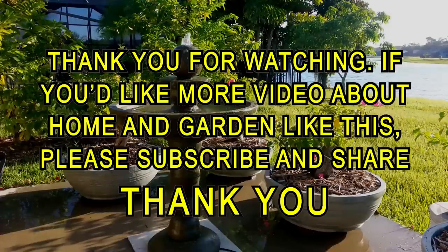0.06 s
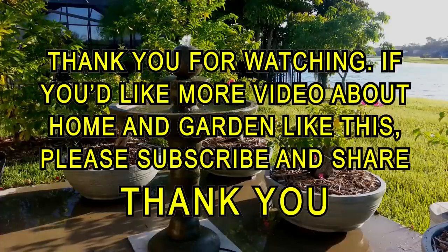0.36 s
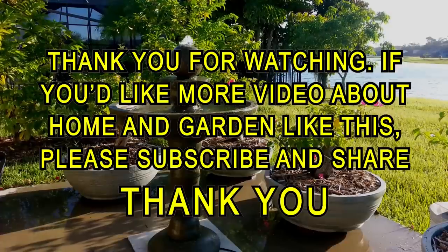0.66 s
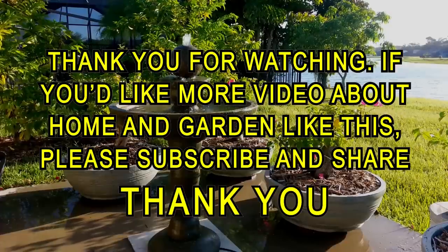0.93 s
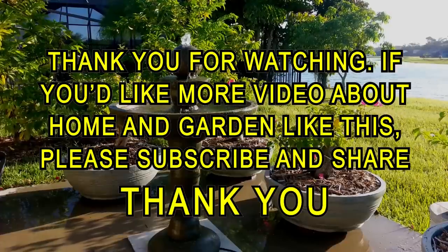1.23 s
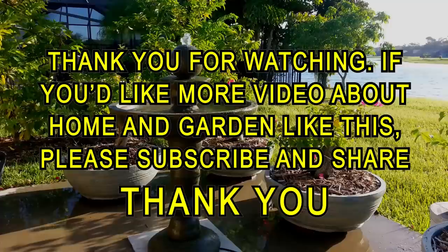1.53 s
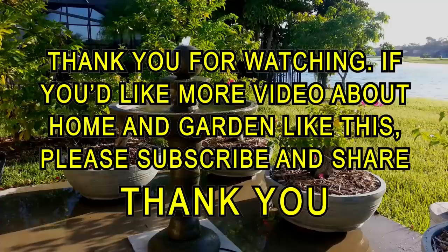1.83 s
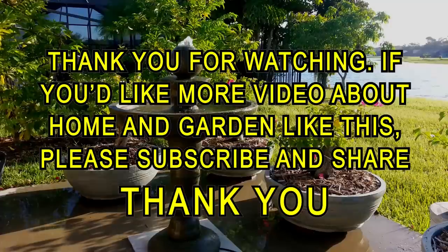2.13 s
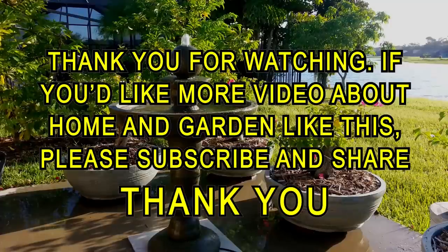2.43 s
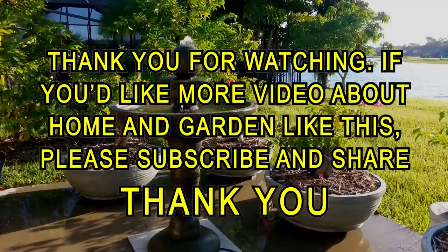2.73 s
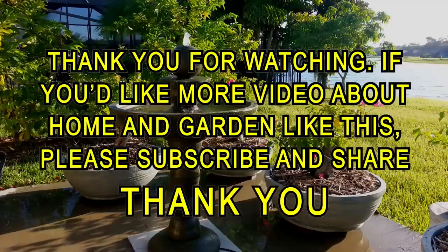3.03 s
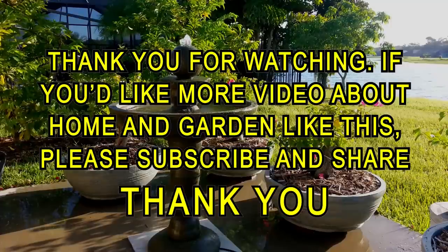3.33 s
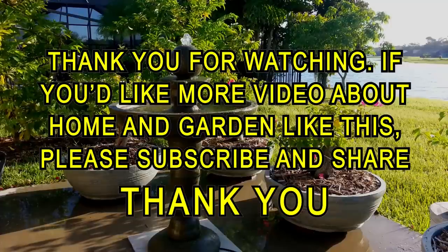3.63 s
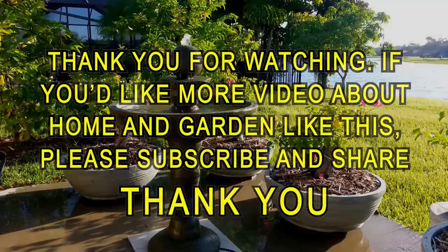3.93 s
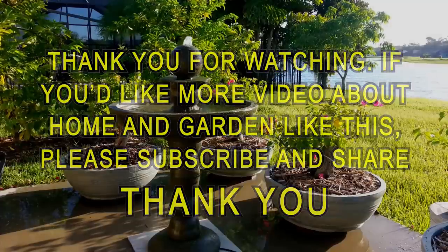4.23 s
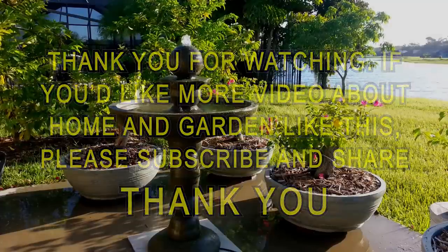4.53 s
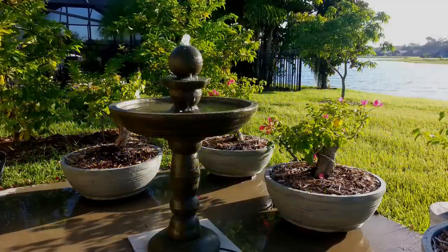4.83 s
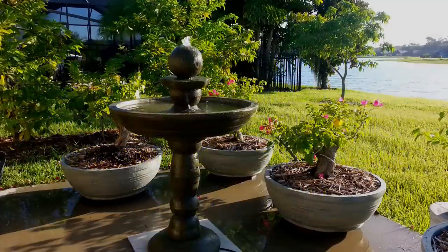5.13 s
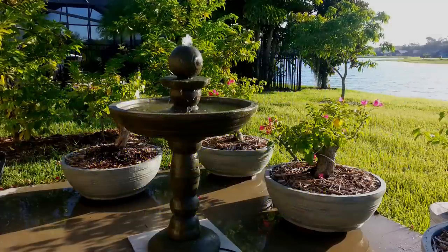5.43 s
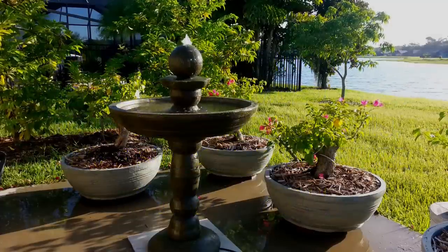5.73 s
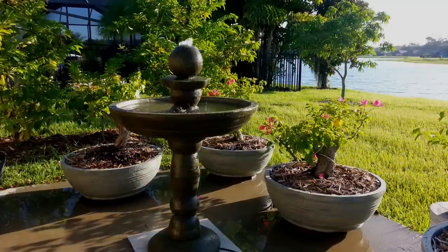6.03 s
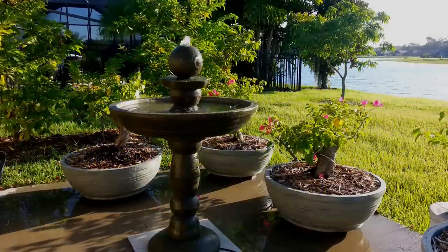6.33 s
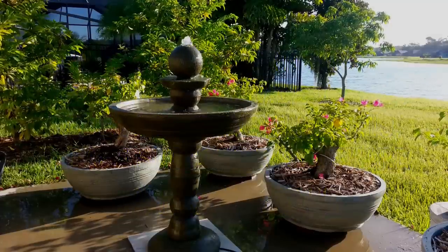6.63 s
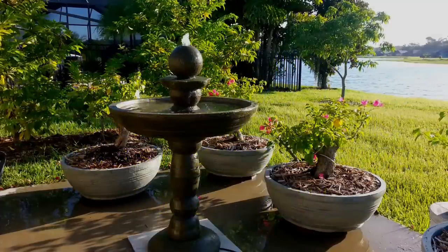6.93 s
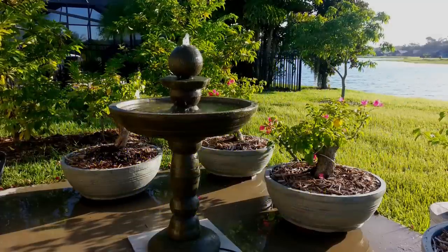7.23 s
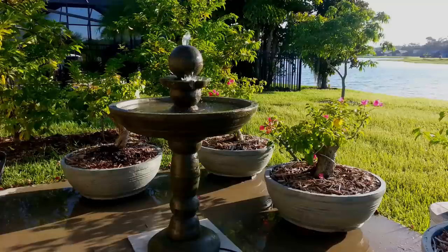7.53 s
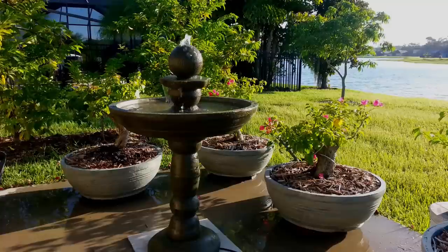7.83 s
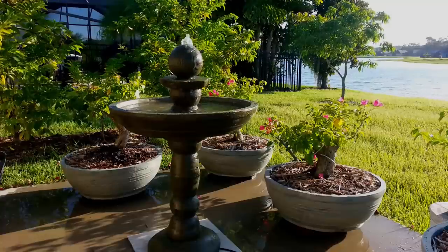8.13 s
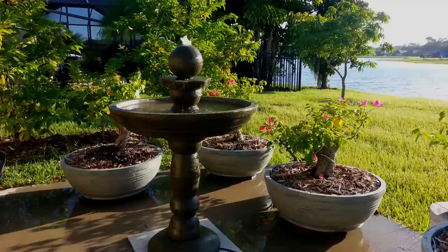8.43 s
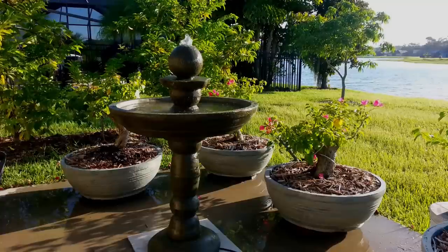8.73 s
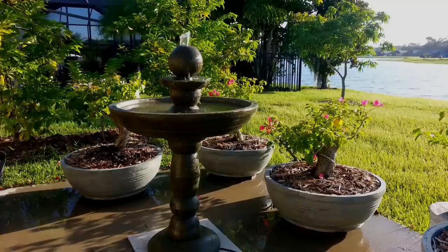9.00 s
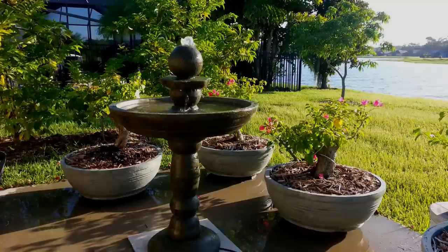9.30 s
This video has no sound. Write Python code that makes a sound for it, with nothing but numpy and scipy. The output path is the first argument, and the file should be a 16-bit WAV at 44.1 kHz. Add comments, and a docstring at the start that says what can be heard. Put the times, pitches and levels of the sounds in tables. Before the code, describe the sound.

A small cement fountain trickles and splashes close by for about nine and a half seconds, over a soft, steady outdoor hum. From the start, water spills into the bowl in loose little gushes, making a continuous babble of bubbles with distinct plinks and rounder plops. Drops slap the wet cement and scatter into fine, ticking spray, and the bowl adds a slight hollow ring. The water sits a little to the left, with clearer plops near 0.4, 3 and 4.4 seconds. From about 5 to 8 seconds it is slightly lighter and more centered. One faint, dull knock sounds under the patter near 7 seconds. A cluster of plops comes just after 8 seconds, and the whole sound dips for an instant at about 8.3 seconds. The trickle then carries on, leaning left again, with a small gush at the end.

```python
"""A small cement fountain in a quiet garden.

Over a soft outdoor hum, water wells over the top in uneven gushes and falls into the bowl. Trapped air
bubbles resonate as babble, plinks and plops; drops strike the wet cement and scatter into fine spray.
Each impulse excites the bowl's modes and a short reverberation. Late on come one dull knock and a
brief dip in level."""
import sys
import numpy as np
from scipy import signal
from scipy.fft import rfft, irfft
from scipy.io import wavfile

SR = 44100
rng = np.random.default_rng(int(sys.argv[2]) if len(sys.argv) > 2 else 0)


def unload_wav(signal):
    """Save mono or channel-first audio to the path in sys.argv[1] as 16-bit WAV at rate SR, clipped to [-1, 1]."""
    wavfile.write(
        sys.argv[1],
        SR,
        np.round(np.clip(np.atleast_2d(signal).T, -1, 1) * 32767).astype(np.int16),
    )


N = 421596
LAG_S = 0.0018  # scale of the delay between the channels, different for every drop
FLUTTER_PER_S = 14  # how fast the falling strands break up
SPLASHY_HZ = 1640  # bubbles below this pitch slip in with less and less splash


def from_db(db):
    """Decibels to amplitude ratio."""
    return 10 ** (np.asarray(db) / 20)


def unit(x):
    """Normalisation to an rms of 1."""
    return x / np.sqrt(np.mean(x ** 2) + 1e-20)


def spectrum(table, hz, column=1):
    """Linear interpolation of a column over log frequency."""
    table = np.array(table)
    return np.interp(np.log(hz + 1), np.log(table[:, 0] + 1), table[:, column])


def curve(table, column=1):
    """Linear interpolation of a column over the whole duration."""
    table = np.array(table)
    return np.interp(np.arange(N) / SR, table[:, 0], table[:, column])


def add(track, s, sound):
    """Superposition of a sound on a track at s seconds."""
    part = track[max(round(s * SR), 0):][:len(sound)]
    part += sound[:len(part)]


def add_pair(pair, s, sound, lag, pan_db):
    """Localisation by time and level difference: the right channel is lag seconds later."""
    add(pair[0], s, sound * from_db(pan_db / 2))
    add(pair[1], s + lag, sound * from_db(-pan_db / 2))


def wander(per_s):
    """Random modulation of spread about 1, turning per_s times a second."""
    points = np.clip(rng.standard_normal(600), -2, 2)
    return np.interp(np.arange(N) / SR * per_s, np.arange(len(points)), points)


def butterworth(x, order, hz, kind):
    """Filtering with a maximally flat passband."""
    return signal.sosfilt(signal.butter(order, hz, kind, fs=SR, output="sos"), x + 1e-18)


def resonate(x, hz, q):
    """A second-order resonance that conserves the power of white noise."""
    return signal.lfilter(*signal.iirpeak(hz, q, fs=SR), x) * np.sqrt(q * SR / (np.pi * hz))


def colour(x, table, size=2048):
    """Minimum-phase filtering gives each channel its own spectrum and keeps attacks sharp."""
    hz = abs(np.fft.fftfreq(size, 1 / SR))
    log_gain = np.log(from_db([spectrum(table, hz, 1), spectrum(table, hz, 2)]))
    taps = np.fft.ifft(np.exp(signal.hilbert(log_gain).conj())).real
    return signal.oaconvolve(x, taps / np.sqrt((taps ** 2).sum() / 2), axes=1)[:, :N]


# Spectrum of the distant hum. Each row: frequency in Hz, relative spectral density in dB.
HUM_SPECTRUM = [(15, -19), (30, -8), (55, -4.5), (150, -1.5), (260, -3), (380, -2), (520, -6), (900, -11.5),
                (2000, -10.5), (6000, -14.5), (10500, -33), (12000, -41)]

def outdoor_hum(level_db=-55.5, shared=0.3, waver_db=2.5, wavers_per_s=12.5):
    """Diffuse ambient noise: a wavering hum, only weakly correlated between the channels."""
    noise = rng.standard_normal((3, N))
    gain = from_db(spectrum(HUM_SPECTRUM, np.fft.rfftfreq(N, 1 / SR)))
    hum = irfft(rfft(noise[:2] + shared * noise[2]) * gain, N)
    return unit(hum * from_db(waver_db * wander(wavers_per_s))) * from_db(level_db)


def gushes(per_s=3.1, uneven=0.32):
    """Quasi-periodic overflow: water slops over the rim in a loose rhythm, from -1 to 1."""
    rate = per_s * (1 + uneven * wander(per_s))
    return np.sin(2 * np.pi * np.cumsum(rate) / SR)


def bubble(hz, ring_s, rise_per_s=2.0, swell_cycles=1.0, hold=1.24):
    """Damped oscillation of trapped air, rising in pitch as the bubble nears the surface."""
    t = np.arange(0, 3 * ring_s, 1 / SR)
    cycles = np.cumsum(hz * (1 + rise_per_s * (t - ring_s / 2))) / SR
    envelope = (1 - np.exp(-cycles / swell_cycles)) * np.exp(-(t / ring_s) ** hold)
    return envelope / envelope.max() * np.sin(2 * np.pi * cycles)


def splat(crack_s, scatter_s, scatter_db, grain_db=-8.5):
    """Impact noise: a drop bursts with a crack, and its droplets land in a grainy decay."""
    t = np.arange(5000) / SR
    grains = unit(from_db(grain_db * rng.standard_normal(125)).repeat(40))
    envelope = np.exp(-t / crack_s) + from_db(scatter_db) * grains * np.exp(-t / scatter_s)
    return rng.standard_normal(len(t)) * envelope * (1 - np.exp(-t / .0012))


# The falling water. Each row: time in seconds, level into the bowl in dB, level as spray in dB,
# left-right bias in dB (the babble follows it in part).
FLOW = [(0, -50, -49.5, 6.5), (0.53, -51, -51, 8), (0.74, -41, -49.5, 6), (0.88, -45.5, -46, 7),
        (0.98, -46, -55.5, 4), (1.05, -43.5, -52.5, 1), (1.28, -49, -49, 3), (1.4, -44.5, -54, 10),
        (1.53, -48, -53, 3), (2.08, -46, -53, 7), (2.36, -52, -53.5, 3), (2.8, -45, -53, 10),
        (2.94, -48, -64, 9), (3.05, -45.5, -50.5, 6), (3.25, -49.5, -55.5, 7), (3.52, -47, -54, 7),
        (3.65, -51, -60.5, 10), (3.72, -46, -51.5, 2.5), (4.07, -44.5, -52, 3), (4.39, -46, -56, 7),
        (4.5, -47.5, -49, 1), (4.58, -50, -43.5, 7), (4.68, -51, -55, 7), (4.87, -50.5, -53, 5.5),
        (5.22, -55, -51.5, 0), (5.38, -54.5, -51.5, 3), (5.45, -47, -51.5, 3.5), (5.72, -48.5, -55.5, -6),
        (5.8, -53, -65, 6), (5.88, -53, -49.5, 4), (5.96, -55, -54.5, 8), (6.18, -48.5, -57, 1),
        (6.28, -54, -51.5, 3), (6.4, -59.5, -54, 1), (6.52, -41.5, -51, -1), (6.63, -55, -55.5, -4),
        (6.8, -49.5, -55, 1.5), (7.05, -54.5, -59, -2), (7.14, -50.5, -55, 1), (7.3, -47.5, -56.5, -2),
        (7.48, -48.5, -50.5, -6), (7.9, -48, -53.5, -1), (8, -51, -54, 1), (8.36, -49.5, -52.5, 8.5),
        (8.56, -49, -50.5, 7), (8.81, -48.5, -50.5, 13), (9.1, -52, -49.5, 4.5), (9.48, -45, -49.5, 3),
        (9.56, -37, -55, 1)]
# Spectrum of the small bubbles. Each row: frequency in Hz, left and right relative levels in dB.
BABBLE_SPECTRUM = [(720, -18.5, -13), (770, -5, -6.5), (1032, 3.5, 1.5), (1075, -7, -4.5), (1270, -3.5, -1),
                   (1457, -7, -27.5), (1600, 0.5, -2.5), (1880, -6.5, -5.5), (2065, 0.5, -8.5),
                   (2300, -5, -6), (2755, -18.5, -14.5), (2760, -30, -55), (3450, -13, -11)]

def babble(gush, per_s=480, size_db=3.0, ring_cycles=9, ring_spread=0.54, pan_db=3, churn_db=-11,
           level_db=1.86, gush_db=-0.5, flutter_db=1.5, lean=0.68):
    """Incoherent sum of many small bubble resonances, louder when more water falls."""
    out, slots, kinds = np.zeros((2, N)), 7000, 260
    chance = rng.random((slots, 2))
    normal = np.clip(rng.standard_normal((slots, 3)), -2.5, 1.5)
    lengths = np.clip(rng.standard_normal(kinds), -2.5, 1.5)
    sounds = []
    for pitch, length in zip(np.linspace(0, 1, kinds), lengths):
        hz = 760 * (3300 / 760) ** (pitch ** 0.718)  # big, low bubbles are rarer
        splash = splat(crack_s=0.0064, scatter_s=0.0053, scatter_db=-29)[:SR // 16]
        sound = from_db(churn_db) * resonate(splash, hz, q=11.5)
        add(sound, 0, bubble(hz, ring_cycles / hz * np.exp(ring_spread * length)))
        sounds.append(hz * sound)
    for k, ((when, born), (size, side, late)) in enumerate(zip(chance, normal)):
        if born < per_s * N / SR / slots:
            sound = sounds[k % kinds] * from_db(size_db * size)
            add_pair(out, when * N / SR, sound, LAG_S * late, pan_db * side)
    left, right = butterworth(colour(out, BABBLE_SPECTRUM), 4, 3800, "low")
    pour = from_db(curve(FLOW) + level_db + gush_db * gush + flutter_db * wander(FLUTTER_PER_S))
    to_left = from_db(lean * curve(FLOW, column=3) / 2)
    return np.array([unit(left) * to_left, unit(right) / to_left]) * np.hypot(pour, swarms())


# Spectrum of the spray. Each row: frequency in Hz, left and right relative levels in dB.
SPRAY_SPECTRUM = [(2550, -5, -12), (3820, -18, -21), (3940, -12.5, -16), (5660, -8.5, -31),
                  (6250, -20.5, -29), (7016, -10.5, -4.5), (8080, -32, -17), (8550, -13.5, -7),
                  (10100, -22.5, -18.5), (10830, -25, -13), (10800, -22, -64), (12100, -40, -62),
                  (15800, -67, -76)]

def spray(gush, drops_per_s=120, drop_spread_db=3.5, plinks_per_s=380, plink_spread_db=5.0,
          plink_cycles=24, plinks_db=-5, fizz_db=-6.5, gush_db=1.0, flutter_db=3.5):
    """Air entrainment: light drops land and leave tiny ringing bubbles; the finest droplets fizz."""
    drops, plinks = np.zeros((2, 2, N))
    slots, per_drop = 1600, 8
    chance = rng.random((slots, 2))
    normal = np.clip(rng.standard_normal((slots, 3)), -2.5, 1.8)
    fizz = rng.standard_normal((2, N))
    bursts = [resonate(splat(crack_s=.007, scatter_s=.028, scatter_db=-8), hz, q=4)
              for hz in np.linspace(3000, 10500, 120)]
    rings = [bubble(hz, plink_cycles / hz, swell_cycles=3) for hz in np.linspace(2900, 10100, 150)]
    plink_chance = rng.random((slots, per_drop, 3))
    plink_size = np.clip(rng.standard_normal((slots, per_drop)), -2.5, 1.6)
    for k, ((when, born), (size, side, late)) in enumerate(zip(chance, normal)):
        if born < drops_per_s * N / SR / slots:
            s, strength, lag = when * N / SR, from_db(drop_spread_db * size), LAG_S * late
            add_pair(drops, s, bursts[k % len(bursts)] * strength, lag, 2 * side)
            for (delay, pitch, trapped), loud in zip(plink_chance[k], plink_size[k]):
                if trapped < plinks_per_s / drops_per_s / per_drop:
                    gain = np.sqrt(strength) * from_db(plink_spread_db * loud)
                    plink = rings[int(pitch * len(rings))] * gain
                    add_pair(plinks, s + .04 * delay ** 2, plink, lag, 3 * side)
    water = sum(from_db(db) * unit(colour(layer, SPRAY_SPECTRUM))
                for layer, db in [(drops, 0), (plinks, plinks_db), (fizz, fizz_db)])
    return water * from_db(curve(FLOW, column=2) + gush_db * gush + flutter_db * wander(FLUTTER_PER_S))


# The loudest bubbles. Each row: start in seconds, level in dB, pitch in Hz, ring time in seconds,
# left minus right in dB.
LOUD_BUBBLES = [(0.014, -35, 1260, 0.0066, 10), (0.126, -32.5, 957, 0.012, 9), (0.168, -34, 840, 0.012, 2),
                (0.255, -26.5, 1940, 0.0052, 2), (0.287, -27, 1160, 0.0018, 6),
                (0.329, -29, 2050, 0.0016, 4), (0.364, -19.5, 970, 0.009, 4.5),
                (0.398, -33.5, 2115, 0.0075, 3), (0.442, -29.5, 1500, 0.0014, 10),
                (0.512, -23, 2020, 0.0053, 6), (0.528, -33.5, 1610, 0.0075, 10),
                (0.573, -24.5, 1180, 0.0019, 6), (0.582, -29.5, 1720, 0.0035, 12),
                (0.62, -19.5, 1580, 0.0026, 6), (0.628, -27.0, 2140, 0.0057, 1),
                (0.642, -30.5, 928, 0.012, 8), (0.66, -34, 2320, 0.0036, -2), (0.691, -30.5, 887, 0.021, 6),
                (0.727, -32.5, 1256, 0.0072, 11), (0.742, -30, 2180, 0.016, -8),
                (0.849, -34, 1016, 0.0078, 9), (0.885, -33.5, 853, 0.021, 7.5),
                (0.886, -32, 2120, 0.0046, 12), (0.939, -32, 1690, 0.0059, 2), (1.005, -32, 904, 0.0079, 5),
                (1.015, -26, 920, 0.0054, 7), (1.022, -29, 2420, 0.0058, -4), (1.063, -27, 2120, 0.003, 5),
                (1.068, -31.5, 1050, 0.025, 6), (1.122, -28, 2090, 0.0044, 3), (1.14, -34, 970, 0.011, 6),
                (1.175, -25, 2050, 0.0035, 9), (1.185, -28, 2027, 0.0064, 3), (1.238, -35, 2000, 0.0042, 3),
                (1.26, -39, 1090, 0.006, 10), (1.326, -29.5, 1950, 0.0066, 4),
                (1.342, -30.5, 804, 0.036, 4), (1.358, -21, 853, 0.0088, 7), (1.38, -29, 986, 0.0093, 10),
                (1.452, -31, 2010, 0.0026, 14), (1.46, -32, 2380, 0.0083, 2), (1.662, -23, 870, 0.013, 5),
                (1.731, -32, 1230, 0.017, 7), (1.8, -31.5, 1494, 0.0039, 21),
                (1.837, -40.5, 796, 0.0067, 3), (1.885, -24.5, 1700, 0.0062, 7),
                (1.895, -45, 1690, 0.015, -2), (1.902, -29.5, 2200, 0.0018, 9),
                (2.05, -31, 1610, 0.018, 2.5), (2.09, -33, 1650, 0.0046, 7), (2.113, -25, 977, 0.0097, 5),
                (2.215, -31, 1860, 0.005, 5), (2.258, -29.5, 2040, 0.0018, 11),
                (2.298, -31.5, 2100, 0.0031, 10), (2.39, -32.5, 964, 0.012, 3),
                (2.408, -26, 1980, 0.0033, 4), (2.447, -36, 904, 0.013, 1), (2.455, -29, 1000, 0.012, 1),
                (2.467, -31, 1995, 0.011, 7), (2.503, -32, 995, 0.008, 6), (2.504, -28.5, 2050, 0.0046, 7),
                (2.518, -29, 1620, 0.003, 21), (2.523, -32.5, 2040, 0.0025, 12),
                (2.56, -34, 2140, 0.006, 7), (2.561, -28, 1190, 0.0063, 5), (2.732, -32.5, 1930, 0.0075, 3),
                (2.744, -30, 974, 0.022, 5), (2.751, -28.0, 2860, 0.0018, 2), (2.799, -27, 1200, 0.0033, 1),
                (2.819, -34, 875, 0.011, 5.5), (2.867, -32, 900, 0.015, 4), (2.887, -27.5, 1570, 0.0042, 6),
                (2.98, -23.5, 1670, 0.0041, 2), (2.984, -20.5, 920, 0.0089, 2),
                (3.019, -33.5, 1005, 0.0094, 8), (3.03, -24, 2150, 0.0033, 3),
                (3.082, -34.5, 2100, 0.0075, 9), (3.096, -29.5, 1626, 0.018, 7),
                (3.101, -38, 2060, 0.0087, 10), (3.16, -31.5, 1555, 0.0092, 7),
                (3.264, -29, 2030, 0.0025, 4), (3.387, -33.5, 1570, 0.0082, 3),
                (3.604, -30, 2046, 0.0067, -4), (3.61, -29, 1660, 0.0068, 7),
                (3.692, -27.5, 2170, 0.0013, 2), (3.714, -28, 1070, 0.0067, -1),
                (3.721, -30, 1810, 0.0037, -10), (3.727, -25.5, 1240, 0.0065, 14),
                (3.735, -32, 1690, 0.0037, 10), (3.735, -25.5, 1210, 0.0075, -8),
                (3.777, -33.5, 940, 0.0083, 5), (3.975, -44, 1630, 0.0035, -3),
                (4.043, -32.0, 952, 0.026, 11.5), (4.085, -31.5, 970, 0.011, 6),
                (4.107, -31, 873, 0.018, 0), (4.128, -32, 1670, 0.0064, -14),
                (4.128, -32.5, 962, 0.016, -16), (4.136, -31, 960, 0.0085, 14),
                (4.136, -34, 1630, 0.0028, 14), (4.168, -25.5, 2030, 0.00215, 14),
                (4.179, -36, 2090, 0.0041, 8), (4.192, -37, 1010, 0.015, 1), (4.236, -24, 1120, 0.0024, 1),
                (4.245, -32, 1120, 0.0075, 0), (4.373, -34, 1030, 0.0048, 12), (4.39, -20, 920, 0.014, 7),
                (4.402, -21.5, 983, 0.011, -3), (4.515, -33.5, 1650, 0.012, 9),
                (4.523, -32.5, 2130, 0.015, 1), (4.567, -36.5, 2100, 0.016, 5),
                (4.616, -37, 2160, 0.0091, 12), (4.632, -26.5, 1870, 0.0063, 6),
                (4.725, -29, 1930, 0.0018, 4), (4.745, -22, 896, 0.0093, 4.5),
                (4.762, -31.5, 855, 0.017, 2), (4.811, -31, 1990, 0.0044, 6), (4.914, -39, 2120, 0.01, 7),
                (5.055, -32, 2140, 0.0098, 0), (5.131, -29.5, 1560, 0.0028, 6),
                (5.187, -26.5, 1006, 0.016, 1), (5.327, -33.5, 2020, 0.0036, 1),
                (5.341, -33.5, 1574, 0.012, 6), (5.423, -37, 2220, 0.0058, -9),
                (5.466, -33, 985, 0.0049, 0), (5.786, -34, 2080, 0.0077, 0), (5.796, -36, 2080, 0.0081, 8),
                (5.83, -37, 1020, 0.018, -3), (5.882, -26.5, 3260, 0.0027, 3),
                (6.045, -24.5, 1083, 0.009, -3), (6.117, -29.5, 942, 0.014, 1),
                (6.153, -29, 2200, 0.0053, -1), (6.219, -28, 1200, 0.0047, -11),
                (6.32, -38, 1220, 0.0064, -7), (6.321, -32, 1910, 0.0062, 3), (6.495, -26, 741, 0.017, 3),
                (6.516, -26, 946, 0.013, 1), (6.525, -24, 980, 0.005, -6), (6.732, -32.5, 1720, 0.016, 1),
                (6.733, -28, 1040, 0.005, -4), (6.958, -32.5, 2280, 0.0053, -3),
                (7.045, -35, 1004, 0.013, 0), (7.08, -39, 2700, 0.0037, 0),
                (7.087, -34.5, 1044, 0.0087, -11), (7.218, -27.5, 1025, 0.004, -1),
                (7.233, -36, 2024, 0.0041, -1), (7.341, -32, 1640, 0.0038, -3),
                (7.369, -32.5, 1840, 0.0016, 17), (7.644, -32.5, 958, 0.014, -1),
                (7.644, -32, 1570, 0.0035, 1), (7.872, -27.5, 853, 0.016, 0),
                (7.899, -37.5, 1182, 0.012, -2), (7.907, -35, 2000, 0.005, 3),
                (8.076, -36, 1020, 0.0056, -2), (8.104, -32.5, 1650, 0.0036, 1),
                (8.154, -21.5, 918, 0.028, 2), (8.161, -21.5, 950, 0.0061, -15),
                (8.182, -20.5, 973, 0.0046, -1), (8.217, -32, 1717, 0.0074, 15),
                (8.345, -42, 820, 0.036, 4), (8.442, -18, 1164, 0.0046, 3), (8.505, -30.5, 1647, 0.0079, 6),
                (8.528, -33, 2490, 0.0061, 2), (8.662, -24.5, 860, 0.016, 6), (8.743, -34, 985, 0.007, 7),
                (8.775, -24, 2030, 0.0052, 2), (8.903, -31.5, 1260, 0.0086, 7),
                (9.005, -35.5, 1450, 0.0074, 4), (9.014, -31.5, 940, 0.012, 8),
                (9.068, -35, 983, 0.0075, 8), (9.144, -27, 1936, 0.0048, 4), (9.175, -27, 1150, 0.0021, 6),
                (9.217, -27, 2000, 0.0024, 4), (9.252, -22.5, 967, 0.0094, 8), (9.286, -36, 2120, 0.01, 8),
                (9.33, -28, 1450, 0.0022, 8), (9.4, -23.5, 2030, 0.0043, 8),
                (9.416, -36.5, 1600, 0.0086, 9), (9.461, -25.5, 1220, 0.0026, 5),
                (9.47, -29, 1760, 0.003, 6.5), (9.508, -23, 1590, 0.0039, 11),
                (9.515, -30, 2170, 0.0054, 2), (9.529, -34, 2090, 0.0041, 9), (9.529, -31, 917, 0.014, 10),
                (9.548, -31, 2300, 0.0029, 2)]

def plops(level_db=0.6, churn_db=-15, wobble_db=2.6, offspring_db=-10):
    """Bubble resonance: deep bubbles hold a clean note; higher ones churn the water and break up."""
    out = np.zeros((2, N))
    for s, db, hz, ring_s, pan_db in LOUD_BUBBLES:
        splash = splat(crack_s=0.0065, scatter_s=0.014, scatter_db=-2.5)
        churn = butterworth(resonate(splash, hz, q=6.1), 2, 6000, "low")
        splashy = min(hz / SPLASHY_HZ, 1)
        tone = bubble(hz, ring_s, hold=np.interp(hz, [1100, SPLASHY_HZ], [1.48, 1.46]))
        drift = np.append(0, rng.uniform(-1.5, 1.5, 29))  # the amplitude turns every 4 ms
        wobble = np.interp(np.arange(len(tone)) / SR, np.arange(30) * .004, drift)
        sound = churn * from_db(churn_db) * splashy ** 2
        add(sound, 0, tone * from_db(wobble_db * wobble))
        add(sound, ring_s, from_db(offspring_db) * splashy ** 3 * offspring(hz))
        gain = from_db(db + level_db) / from_db([pan_db / 2, -pan_db / 2]).mean()
        add_pair(out, s, sound * gain, LAG_S * rng.uniform(-1.069, 1), pan_db)
    return out


def swarms(decay_s=0.013, level_db=-15):
    """Exponential decay: the envelope of the small bubbles that each loud one stirs up."""
    kicks = np.zeros(N)
    for s, db, hz, _, _ in LOUD_BUBBLES:
        add(kicks, s, from_db([db + level_db]) * min(hz / SPLASHY_HZ, 1) ** 2)
    return signal.lfilter([1], [1, -np.exp(-1 / (decay_s * SR))], kicks)


def offspring(hz, within_s=0.029, detune=.13, ring_cycles=8):
    """Fragmentation: a bubble breaks into four, which ring soon after it and near its pitch."""
    out = np.zeros(SR // 8)
    for delay, tune, strength in rng.random((4, 3)):
        pitch = hz * (1 + detune * (2 * tune - 1))
        add(out, within_s * delay, bubble(pitch, ring_cycles / pitch) * 2 * strength * np.exp(-delay))
    return out


# Hollow resonances of the bowl. Each row: frequency in Hz, time to decay by 60 dB in seconds,
# gain in dB relative to the direct sound at that frequency.
BOWL_MODES = [(1235, 0.2, -6.5), (1625, 0.07, -2), (2092, 0.25, 1.5), (2720, 0.016, 9), (3374, 0.081, -2.5)]

def echoes(x, yard_t60=0.22, yard_db=-15, wall_t60=0.11, wall_db=-9, wall_band_hz=(1600, 6000)):
    """Reverberation: paving and pots scatter a faint tail, wet walls blur it, the bowl's modes ring."""
    t = np.arange(SR // 2) / SR
    fade = from_db(-60 * t / yard_t60) * (1 - np.exp(-t / 0.0017))
    response = rng.standard_normal((2, len(t))) * fade / np.linalg.norm(fade) * from_db(yard_db)
    blur = from_db(-60 * t / wall_t60) * (1 - np.exp(-t / 0.0033))
    walls = butterworth(rng.standard_normal((2, len(t))) * blur, 3, wall_band_hz, "band")
    response += walls / np.linalg.norm(blur) * from_db(wall_db)
    for (hz, t60, db), phases in zip(BOWL_MODES, rng.random((len(BOWL_MODES), 2, 1))):
        decay = from_db(-60 * t / t60)
        response += from_db(db) * 2 * decay / decay.sum() * np.sin(2 * np.pi * (hz * t + phases))
    return signal.oaconvolve(x, response, axes=1)[:, :N]


# The finest droplets. Each row: start in seconds, level before filtering in dB.
DROPLET_TICKS = [(0.2553, -55), (0.4307, -56), (0.6953, -61), (0.8121, -52), (1.1448, -65), (1.3274, -57),
                 (1.6252, -57), (1.7774, -67), (2.1166, -55), (2.2997, -52), (2.8449, -59), (3.3383, -65),
                 (4.0557, -57), (4.6224, -67), (5.015, -48), (5.1013, -58), (5.5767, -63), (5.9459, -58),
                 (6.3026, -62), (6.7022, -54), (7.0783, -61), (7.222, -61), (7.49, -62), (7.6106, -61),
                 (8.4312, -59), (8.8453, -51), (9.0194, -58), (9.2983, -52)]

def ticks(level_db=-1, band_hz=(9500, 14500), pan_spread_db=4):
    """Small impacts radiate high frequencies: single droplets tick on bare cement."""
    out = np.zeros((2, N))
    for s, db in DROPLET_TICKS:
        late, side = rng.uniform(-1.3, 1, 2)
        tick = splat(crack_s=0.0078, scatter_s=0.017, scatter_db=-1.5)
        add_pair(out, s, tick * from_db(db + level_db), LAG_S * late, pan_spread_db * side)
    return butterworth(out, 2, band_hz, "band")


# The heaviest drops on cement. Each row: start in seconds, relative level in dB, pitch in Hz,
# left minus right of the pitched part in dB.
HEAVY_DROPS = [(0.358, -36, 4200, 5), (0.4318, -34.5, 3830, 5), (0.602, -24, 6600, -0.5),
               (0.6928, -28, 8600, 0), (0.85, -30, 4670, 6), (0.919, -28, 4780, 7), (1.061, -26, 4730, 6),
               (1.259, -27.5, 4080, 3.5), (1.373, -30.5, 4780, 10), (1.481, -18, 8200, -3),
               (1.6254, -23, 5260, 17.5), (1.6506, -21.5, 7350, -2), (1.7417, -34.5, 5500, 26),
               (1.91, -33, 5070, 15), (2.114, -22, 6380, -1), (2.4105, -21.5, 8540, -6),
               (2.749, -36, 2850, -1), (2.762, -24.5, 7200, -10), (2.846, -27.5, 8700, -4),
               (2.9786, -25.5, 7200, -2), (3.342, -17.5, 8870, -5), (3.766, -30, 7300, 1),
               (3.914, -23, 6700, -2.0), (4.008, -27.5, 5370, 7), (4.2644, -33, 3510, 6),
               (4.546, -26, 2770, 3), (4.583, -27, 3300, 6), (4.632, -44, 3880, 3),
               (4.7287, -29.5, 8950, -6), (4.9553, -32, 9360, -8), (5.306, -27, 8900, -2),
               (5.439, -27, 7650, -6), (5.576, -32, 7060, -9), (5.697, -30, 3440, 8),
               (5.7861, -26.5, 2850, 2), (5.813, -32, 8040, -8), (5.883, -25, 4310, 5),
               (5.948, -35.5, 6960, -16), (6.223, -29, 8760, -16), (6.476, -19.5, 6840, -3),
               (7.0795, -26, 2800, -5), (7.133, -25, 3300, 1), (7.2, -33, 7000, -10),
               (7.226, -26.5, 7400, -10), (7.294, -31.5, 4070, -8), (7.325, -32, 7700, -5),
               (7.338, -28, 3456, 4), (7.378, -33, 3240, 9), (7.838, -29, 3690, 1), (8.104, -29, 4520, 0),
               (8.435, -22, 5430, 7), (8.771, -22, 7040, 0), (8.891, -31, 7040, -8), (8.962, -31, 2720, 5),
               (9.318, -32, 3700, 3), (9.49, -25, 6780, -4)]

def slaps(level_db=-7, wide_db=-5, bandwidth_hz=1600, ping_db=1, tinkle_db=-6, detune=0.146):
    """Impact and cavity resonance: a broadband splash, the ping of the pocket it opens, and tinkles."""
    wide, pitched = np.zeros((2, 2, N))
    for s, db, hz, pan_db in HEAVY_DROPS:
        gain, lag = from_db(db + level_db), LAG_S * rng.uniform(-1, 1)
        burst = splat(crack_s=0.0014, scatter_s=0.034, scatter_db=-18)
        pocket = resonate(burst, hz, q=hz / bandwidth_hz)
        add(pocket, 0, from_db(ping_db) * bubble(hz, ring_s=10 / hz))
        for delay, tune, strength in rng.random((5, 3)):
            tinkle = bubble(hz * (1 + detune * (2 * tune - 1)), ring_s=14 / hz)
            add(pocket, 0.038 * delay ** 2, tinkle * from_db(tinkle_db) * 2 * strength * np.exp(-delay))
        add_pair(wide, s - lag / 2, burst * gain, lag, 0)
        add_pair(pitched, s - lag / 2, pocket * gain, lag, pan_db)
    return butterworth(pitched, 6, 10400, "low") + from_db(wide_db) * colour(wide, SPRAY_SPECTRUM)


# One hollow knock. Its row: start in seconds, peak level in dB, pitch in Hz, ring time in seconds.
KNOCKS = [(6.906, -46, 250, 0.022)]

def knock():
    """A damped sinusoid of constant pitch: one dull, low note under the patter."""
    out = np.zeros(N)
    for s, db, hz, ring_s in KNOCKS:
        add(out, s, from_db(db) * bubble(hz, ring_s, rise_per_s=0))
    return out


def scene(splash_low_hz=1100, bubble_low_hz=520):
    """Superposition: the same gushes feed bowl and spray; sources this small radiate almost no bass."""
    gush = gushes()
    splashes = butterworth(slaps() + spray(gush) + ticks(), 2, splash_low_hz, "high")
    bubbles = butterworth(plops() + babble(gush), 4, bubble_low_hz, "high")
    water = splashes + bubbles
    return water + echoes(water) + outdoor_hum() + knock()


# A brief dip in the whole sound. Each row: time in seconds, gain in dB.
LEVEL_DIP = [(8.281, 0), (8.282, -20), (8.2995, -16), (8.302, -4), (8.36, 0)]

def record(dry, cutoff_hz=15900):
    """Attenuation and band limiting: the level dips once and swells back; the top treble is cut."""
    dipped = dry * from_db(curve(LEVEL_DIP))
    low_pass = signal.firwin(1023, cutoff_hz, window=("kaiser", 9), fs=SR)
    return signal.oaconvolve(dipped, low_pass[None], "same")


dry = scene()
out = record(dry)
unload_wav(out)
```